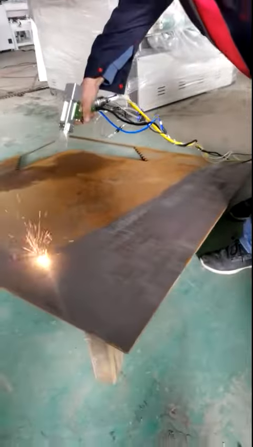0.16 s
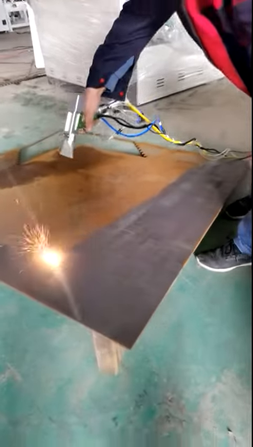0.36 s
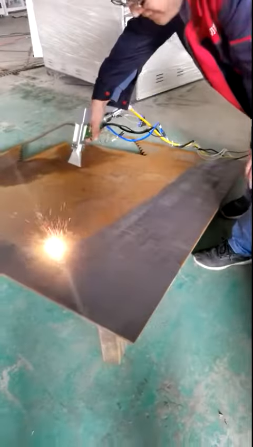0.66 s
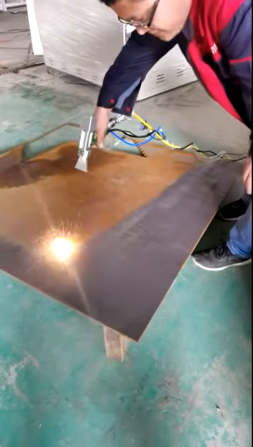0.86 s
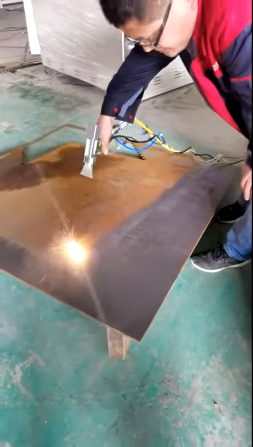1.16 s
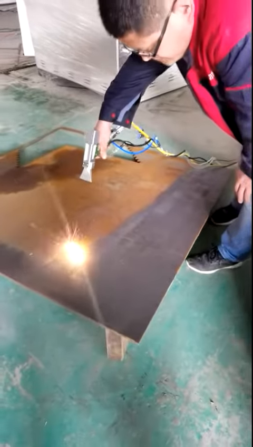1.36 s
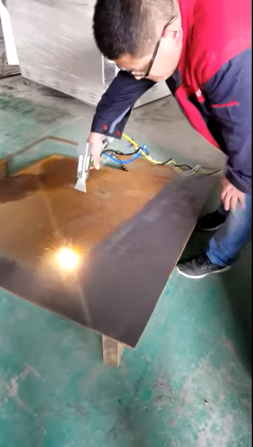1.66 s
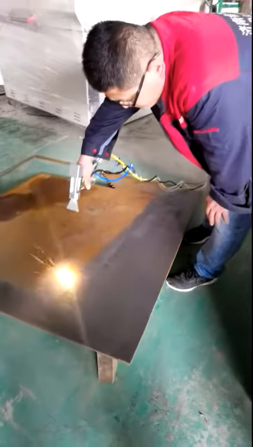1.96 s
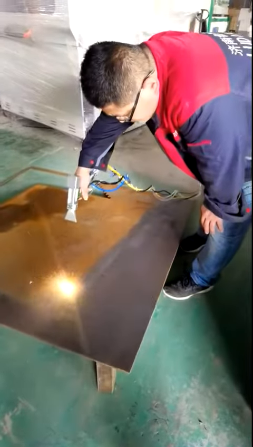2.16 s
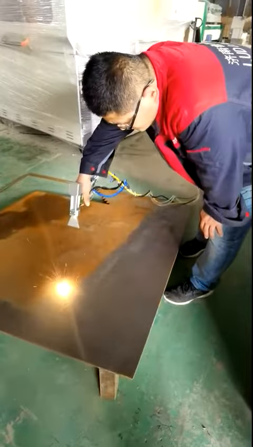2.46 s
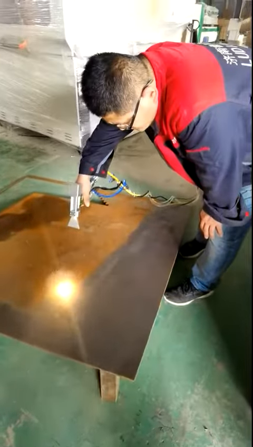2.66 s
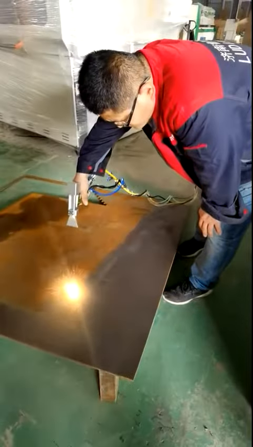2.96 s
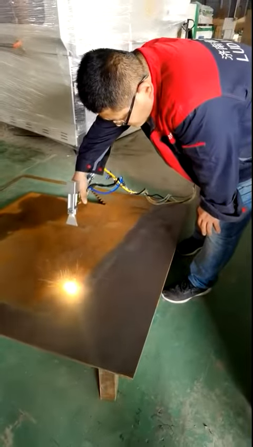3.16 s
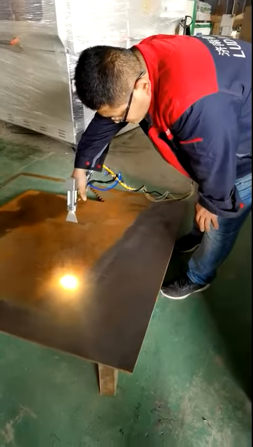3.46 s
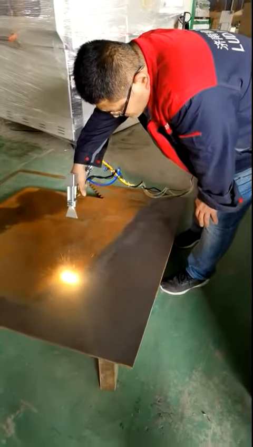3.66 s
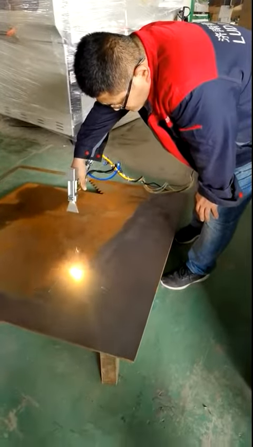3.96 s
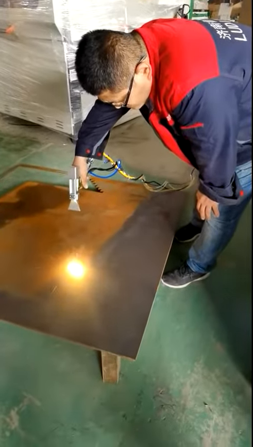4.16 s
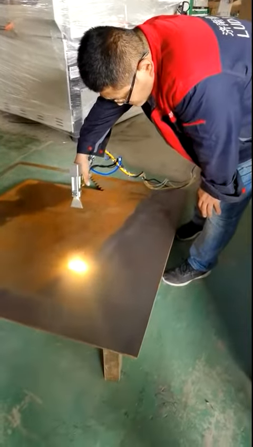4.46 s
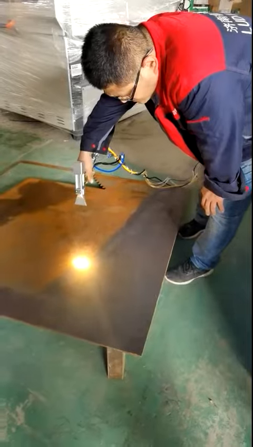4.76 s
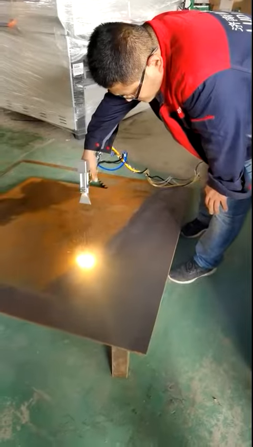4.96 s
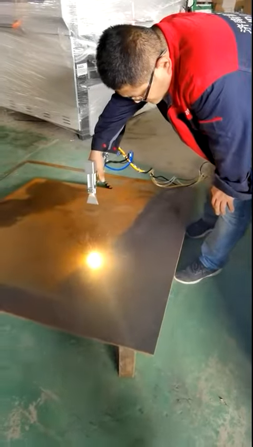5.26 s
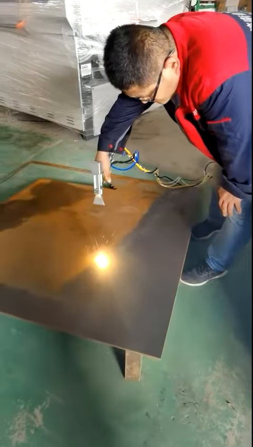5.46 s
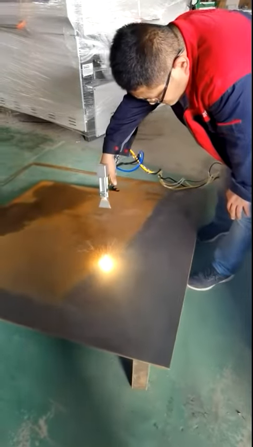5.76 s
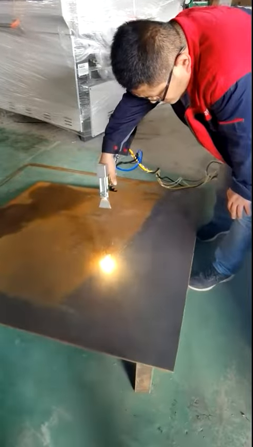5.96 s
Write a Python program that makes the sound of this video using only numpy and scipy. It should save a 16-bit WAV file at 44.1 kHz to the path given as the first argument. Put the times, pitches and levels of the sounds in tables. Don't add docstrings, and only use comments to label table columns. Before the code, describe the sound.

From 0 seconds the laser cleaner is already running: a thin, hard buzz near 2 kHz with bright overtones, bending and fluttering about 25 times a second. A breathy air-jet whistle around 4 kHz and another near 6.5 kHz ride over broad hiss; in the first half second a slightly higher tone slides down and merges into the lower whistle. The buzz swells around 1.4, its base tone dips briefly near 1.85 while the overtones poke out, then it grows firmer by 2.5 and holds. A thin, very high whistle swells around 2.5. From about 3 to 5.5 the airy whistles soften and the buzz dominates, its bend giving way to throbbing. Near 6 hiss and whistles rise again. Low fan wash and 100 Hz hum continue behind, slightly louder at the end. The close phone pickup is grainy, with watery twitter and tiny dropouts.

```python
import sys
import numpy as np
from scipy import signal
from scipy.io import wavfile
from scipy.ndimage import uniform_filter1d

SR = 44100
rng = np.random.default_rng(int(sys.argv[2]) if len(sys.argv) > 2 else 0)


def linear_from_db(decibels):
    return 10 ** (np.asarray(decibels, float) / 20)


def output_pcm(signal):
    pcm = np.clip(np.atleast_2d(signal).T, -1, 1) * 32767
    wavfile.write(sys.argv[1], SR, np.round(pcm).astype(np.int16))


N = 269010
T = np.arange(N) / SR

# time_s, first_partial_db, lift_db
SPOT = [(0, -40, 1.5), (.55, -40.5, 3), (1.1, -38.5, 9), (1.4, -34.5, -2.5), (1.6, -36, 0.5),
        (1.85, -44, 14), (2.0, -36, 1), (2.5, -31.5, -3), (2.95, -33.5, -1.5), (3.4, -32.5, 1),
        (3.8, -33, 1), (4.2, -34.5, -1), (4.8, -31, -3.5), (5.5, -32.5, -1), (6.1, -31.5, -3)]
UPPER_DB = [-27, -29, -23, -29]
# time_s, rate_hz, first_partial_bend (share), throb (factor)
PULSE_RATE = [
    (0, 1999.5, 1.3, .55),
    (2.0, 1999.9, 1.1, .7),
    (2.4, 2000.8, 1, .65),
    (3.9, 2000.9, .9, .95),
    (5.1, 2000.9, .4, 1.25),
    (5.4, 2001.1, .3, 1.5),
    (6.1, 2001.1, .25, 1.5),
]
# multiple (of the sweep rate), path_m, path_lag (turns), swing_db, swing_lag
SWING = [
    (1, .0135, .14, 2.5, .64),
    (2, .003, .04, 1.5, .74),
]
# time_s, low_whistle_hz, high_whistle_hz, air_db
JET = [(0, 3925, 6660, -27), (.16, 4030, 6600, -27), (.23, 3790, 6650, -27), (.4, 3786, 6640, -26),
       (.5, 3900, 6663, -25), (.85, 3870, 6580, -24), (1.3, 3880, 6550, -26), (1.68, 3850, 6546, -23),
       (1.87, 4033, 6520, -24.5), (2.1, 3896, 6600, -23.5), (2.3, 3950, 6554, -24.5),
       (3.35, 3980, 6754, -29.5), (3.65, 4010, 6560, -29), (4.2, 4003, 6340, -33), (4.7, 4010, 6430, -28.5),
       (5.44, 4000, 6414, -32), (5.72, 3980, 6750, -34), (6.0, 4015, 6650, -26)]
# time_s, pitch_hz, level_db
SINKING = [
    (0, 4315, -32),
    (.2, 4154, -34),
    (.45, 4040, -32.5),
    (.7, 3990, -49.5),
    (6.1, 4040, -91),
]
# time_s, pitch_hz, level_db
STRAND = [
    (0, 6260, -33.5),
    (.3, 5930, -35.5),
    (.5, 5943, -42.5),
    (3.4, 6360, -48),
    (4.2, 6397, -35.5),
    (6.1, 6294, -46.5),
]
# centre_s, half_length_s, rise_db
TOP_SWELL = [
    (6.5, 0.45, 8),
]
# centre_s, half_length_s, rise_db
THIN_SWELLS = [
    (.58, 0.44, 6),
    (2.55, .6, 13.5),
    (4.4, 0.71, 4),
    (5.5, 0.27, 9.5),
    (6.0, 0.14, 8.5),
]
# time_s, level_db, head_turn (0-1)
HISS = [
    (0, -33, .15),
    (.35, -36, .1),
    (.7, -34.5, 0.3),
    (1.45, -34, .4),
    (2.3, -37, .35),
    (3.4, -37, .46),
    (4.1, -36.5, 0.3),
    (5.3, -37, .48),
    (6.1, -33, .52),
]
# pitch_hz, level_db (per Hz)
EARLY_COLOUR = [(410, -44.0), (700, -32), (906, -37.5), (1380, -7.0), (1610, -16), (1960, -12),
                (3250, -9.5), (3920, -12.0), (5250, -15.5), (6550, -9.5), (7910, -8.5), (11500, -16),
                (15000, -58.5), (22000, -120)][:-2] + [(13000, -23.5), (15700, -28.5)]
# pitch_hz, level_db (per Hz)
LATE_COLOUR = [(410, -52.0), (700, -28.5), (1790, -18.0), (2010, -6.0), (2660, -21.5), (3650, -15.5),
               (3920, -16.0), (5010, -13.0), (6180, -12), (9100, -35.0), (9760, -23.0), (11500, -29.0),
               (15000, -61), (22000, -120)][:-2] + [(13000, -24), (15700, -44.5)]
# time_s, pitch_hz, depth_db
NOTCH = [
    (0, 6450, 3),
    (1.2, 5700, 0.5),
    (2.3, 6045, 11.5),
    (3.1, 6305, 3),
    (3.5, 6560, 3),
    (4.1, 7030, -1.5),
    (5.3, 7470, -5),
    (5.7, 6590, -2),
    (6.1, 6646, 5),
]
# pitch_hz, level_db (per Hz)
HALL_COLOUR = [(12, -52), (20, -36.5), (69, -9.5), (81, -14.5), (97, -14.5), (115, -10.5), (124, -14.5),
               (195, -12.5), (227, -20), (295, -18.5), (384, -20.5), (716, -10), (880, -21.5),
               (1080, -12.5), (1800, -19.5), (2340, -46), (3960, -120)]
# time_s, level_db
HALL_LEVEL = [
    (0, -51),
    (.6, -49),
    (3.1, -49),
    (3.5, -48),
    (4.7, -48.5),
    (6.1, -45.5),
]
HUM_DB = [-40.5, -56.5, -63.5]
# pitch_hz, step_db
STEP = [(100, -48), (220, -39), (300, -32), (450, -32), (600, -36), (800, -34), (1000, -33), (1400, -31),
        (2700, -25), (3500, -26), (5000, -23), (7000, -27), (8300, -26), (10000, -24.5), (12000, -25),
        (13000, -24), (15700, -27)]
# time_s, extra_step_db
HIGH_STEP = [
    (0, 0),
    (3, .3),
    (4.8, 1.5),
    (6.1, 3.5),
]
# centre_s, half_length_s, extra_step_db
DROUGHTS = [(.08, .06, 5), (.26, .06, 6), (.41, .05, 9), (.56, .05, 8), (.76, .11, 10), (.97, .03, 5),
            (1.3, .06, 6), (1.6, .15, 7), (2.27, .05, 5), (2.56, .05, 7), (2.69, .06, 8), (2.9, .04, 9)]
# centre_s, half_length_s
SPARE = [
    (.145, .012),
    (.31, .012),
    (.49, .014),
    (1.0, .014),
    (1.43, .012),
    (1.94, .03),
    (2.18, .012),
    (2.37, .012),
    (3.01, .012),
]
# start_s, end_s, share_of_blocks (0-1)
PLENTY = [
    (3.15, 3.53, .6),
    (3.67, 4.3, .45),
    (4.41, 4.71, .6),
    (4.82, 5.1, .45),
    (5.31, 6.1, .75),
]
# centre_s, length_s
STARVED = [
    (.483, .009),
    (1.955, .007),
    (3.48, .006),
    (4.925, .012),
    (5.568, .016),
    (6.008, .010),
    (6.056, .011),
]

SWEEP_HZ, MAINS_HZ = 24.97, 100
THIRD_DB = -1.1
FADING_DB, FIRST_FADING_DB, FADING_HZ = 2, 0.82, 3.3
LOW_BEST_HZ, LOW_LOSS_DB = 3850, 3
TOP_HZ, TOP_RISE_HZ, TOP_DB = 8585, 527.3, -38.5
THIN_HZ, THIN_DB = 10950, -47
EASY_DB, LOW_STEP_PER_DB, LOW_EDGE_HZ = -24.6, 1.5, 1750


def evened(x):
    return x / np.sqrt(np.mean(abs(x) ** 2) + 1e-20)


def columns(rows, t):
    s, *rest = np.transpose(rows)
    return [np.interp(t, s, c) for c in rest]


def read(points, hz):
    f, value = np.transpose(points)
    return np.interp(np.log(hz + 1), np.log(f + 1), value)


def swells(rows, t):
    return sum(height * np.exp(-((t - s) / half) ** 2) for s, half, height in rows)


def wander(hz):
    r = np.exp(-2 * np.pi * hz / SR)
    raw = rng.standard_normal(2 * N).view(complex)
    return evened(signal.lfilter([1], [1, -2 * r, r * r], raw))


def noise(shape_db, patchy_db, size):
    hop = size // 4
    hz = np.fft.rfftfreq(size, 1 / SR)[:, None]
    t = np.arange(N // hop + 5) * hop / SR
    a, b, patches = rng.standard_normal((len(t), len(hz), 3)).T
    patches = uniform_filter1d(patches, size=10, axis=0)
    patches = evened(uniform_filter1d(patches, size=12, axis=1))
    z = (a + 1j * b) * linear_from_db(shape_db(hz, t) + patchy_db * patches)
    return evened(signal.istft(z, nperseg=size, noverlap=size - hop)[1][:N])


def sweep():
    path_m, loud_db = 0, 0
    for k, swing_m, path_lag, swing_db, loud_lag in SWING:
        angle = 2 * np.pi * k * SWEEP_HZ * T
        path_m = path_m + swing_m * np.cos(angle - 2 * np.pi * path_lag)
        loud_db = loud_db + swing_db * np.cos(angle - 2 * np.pi * loud_lag)
    return path_m, loud_db


def spot():
    hz, bend, throb = columns(PULSE_RATE, T)
    first_db, lift_db = columns(SPOT, T)
    second_db = first_db + lift_db
    fading_db = FADING_DB * np.sqrt(2) * wander(FADING_HZ)
    first_fading_db = FIRST_FADING_DB * np.sqrt(2) * wander(FADING_HZ).real
    levels_db = [first_db + first_fading_db,
                 second_db + fading_db.real,
                 second_db + THIRD_DB + fading_db.imag]
    levels_db += [second_db + db for db in UPPER_DB]
    path_m, loud_db = sweep()
    turns = np.cumsum(hz) / SR
    late_turns = path_m * hz / 343
    out = np.zeros(N)
    for k, db in enumerate(levels_db, 1):
        rust = 1 + (.12 + .055 * k) * wander(hz=60) + .07 * wander(hz=5)
        phase = k * (turns + late_turns * (bend if k == 1 else 1))
        tone = (rust * np.exp(2j * np.pi * phase)).real
        out += linear_from_db(db - 0.66 + 1.09 * throb * loud_db) * np.sqrt(2) * tone
    return out


def whistle(hz, width_hz, db):
    band = wander(width_hz) * np.exp(2j * np.pi * np.cumsum(hz) / SR)
    return linear_from_db(db) * np.sqrt(2) * band.real


def jet():
    low_hz, high_hz, air_db = columns(JET, T)
    low_db = air_db - LOW_LOSS_DB * np.maximum(low_hz - LOW_BEST_HZ, 0) / 100
    gap_hz, gap_db = columns(SINKING, T)
    strand_hz, strand_db = columns(STRAND, T)
    top_hz = TOP_HZ + TOP_RISE_HZ * columns(HISS, T)[1]
    top_db = TOP_DB + swells(TOP_SWELL, T) - 5.5
    thin_db = THIN_DB + swells(THIN_SWELLS, T) - 7.0
    bands = whistle(low_hz - 80, 160, low_db - 4.0)
    bands += whistle(high_hz, 250, air_db - .8)
    bands += whistle(top_hz, 330, top_db)
    bands += whistle(gap_hz, 250, gap_db)
    bands += whistle(THIN_HZ + 0 * T, 330, thin_db)
    bands += whistle(strand_hz, 150, strand_db)
    return bands * linear_from_db(0.095 * sweep()[1])


def hiss():
    def shape_db(hz, t):
        level_db, turn = columns(HISS, t)
        turn = np.clip(turn, 0, 1)
        return level_db + (1 - turn) * read(EARLY_COLOUR, hz) + turn * read(LATE_COLOUR, hz)
    return linear_from_db(-33) * noise(shape_db, patchy_db=2.2, size=512) * linear_from_db(.2 * sweep()[1])


def plate_echo(x):
    hz, t, z = signal.stft(x, SR, nperseg=512)
    notch_hz, depth_db = columns(NOTCH, t)
    z = z * linear_from_db(-depth_db * np.exp(-((hz[:, None] - notch_hz) / 170) ** 2))
    return signal.istft(z, SR, nperseg=512)[1][:N]


def hall():
    def shape_db(hz, t):
        return read(HALL_COLOUR, hz) + columns(HALL_LEVEL, t)[0]
    wash = noise(shape_db, patchy_db=2.5, size=2048)
    near_db = columns(HALL_LEVEL, T)[0] + 48.5
    hum = 0
    for k, db in enumerate(HUM_DB):
        waver = 1 + 0.16 * wander(hz=2.6)
        tone = np.exp(2j * np.pi * (k + 1) * MAINS_HZ * T)
        hum = hum + linear_from_db(db + 1.5 * k * near_db) * waver * tone
    return linear_from_db(-43) * wash + np.sqrt(2) * hum.real


def rounded(x, step_db, size):
    n, k = np.arange(2 * size), np.arange(size)[:, None] + .5
    window = np.sin(np.pi * (n + .5) / (2 * size))
    basis = np.sqrt(2 / size) * window * np.cos(np.pi / size * (n + .5 + size / 2) * k)
    blocks = np.pad(x, (size, 2 * size - N % size)).reshape(-1, size)
    t = np.arange(len(blocks) - 1) * size / SR
    step = linear_from_db(step_db(k.T * SR / 2 / size, t[:, None]))
    strengths = np.hstack([blocks[:-1], blocks[1:]]) @ basis.T
    parts = (np.round(strengths / step) * step) @ basis
    return (parts[1:, :size] + parts[:-1, size:]).ravel()[:N]


def long_step_db(x, hz, t):
    power = uniform_filter1d(x ** 2, size=SR)
    loud_db = np.interp(t, T, 10 * np.log10(power + 1e-12))
    low_db = LOW_STEP_PER_DB * (loud_db - EASY_DB) + 1.4 * swells(DROUGHTS, t)
    high_db = columns(HIGH_STEP, t)[0] * (hz > 7300)
    luck = rng.random(t.shape)
    spare = sum(abs(t + .012 - s) < half for s, half in SPARE)
    spare = spare + sum((t > a) & (t < b) & (luck < share) for a, b, share in PLENTY)
    band = (18 * np.log(1 + hz[0] / 1500)).astype(int)
    wobble = rng.standard_normal((len(t), band[-1] + 1))[:, band]
    wobble = evened(uniform_filter1d(wobble, size=3, axis=0))
    flicker_db = 4 * rng.standard_normal((len(t), band[-1] + 1))[:, band]
    opening_db = (14 + 4 * (hz > 14400)) * spare
    top_db = (hz > 12400) * (.5 * wobble - opening_db - 1.3 * (hz < 14400)) + 60 * (hz > 15680)
    low_db = np.where(hz < 1200, 1, .4) * low_db - 5 * spare - 2 * wobble + flicker_db
    extra_db = np.where(hz < LOW_EDGE_HZ, low_db, high_db)
    return read(STEP, hz) + extra_db + 2.9 * wobble + .4 * flicker_db * (hz > LOW_EDGE_HZ) + top_db


def phone_rounding(x):
    starved = sum(np.exp(-((T - s) / length * 2) ** 4) for s, length in STARVED)
    short = rounded(x, lambda hz, t: -13 - 30 * (hz < 400), size=128)
    long = rounded(x, lambda hz, t: long_step_db(x, hz, t), size=1024)
    return (1 - starved) * long + starved * short


def scene():
    air = plate_echo(jet() + hiss())
    return (spot() + air + hall())[None]


def top_cut(x):
    return signal.sosfilt(signal.butter(12, 15720, fs=SR, output="sos"), x)


def record(dry):
    mix = phone_rounding(dry[0])[None]
    return top_cut(mix)


dry = scene()
out = record(dry)
output_pcm(out)
```